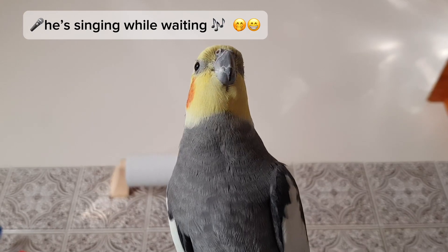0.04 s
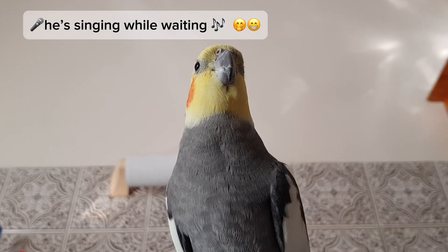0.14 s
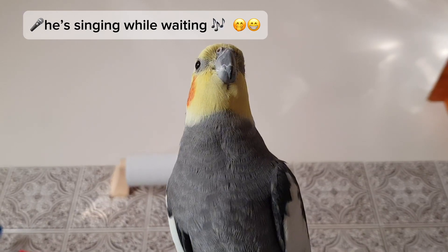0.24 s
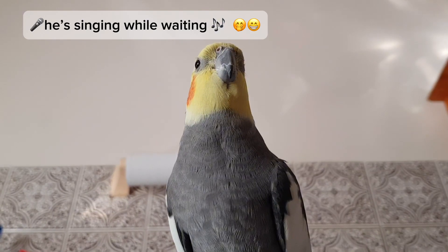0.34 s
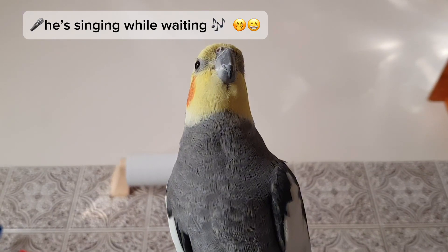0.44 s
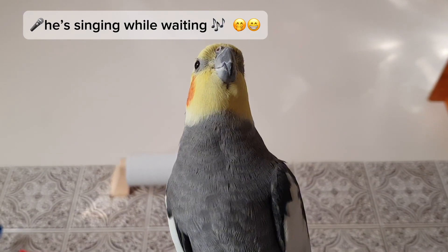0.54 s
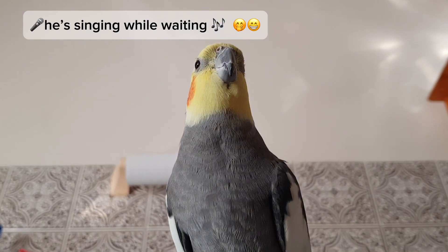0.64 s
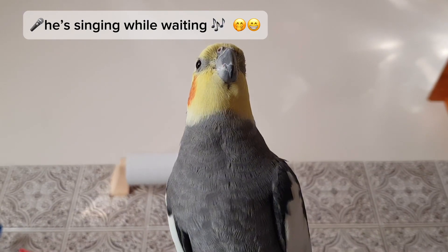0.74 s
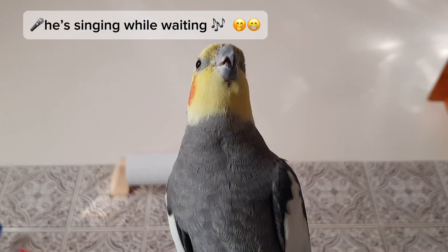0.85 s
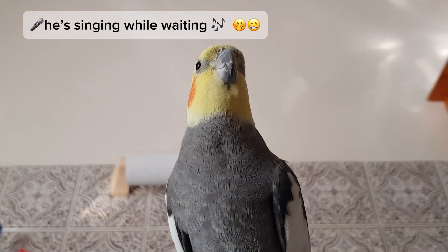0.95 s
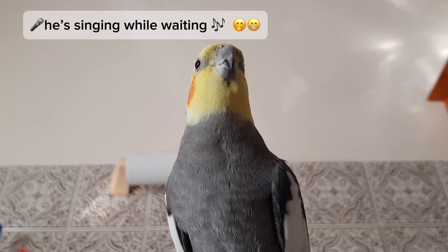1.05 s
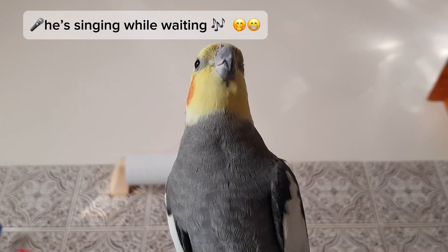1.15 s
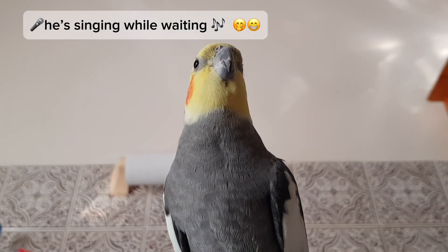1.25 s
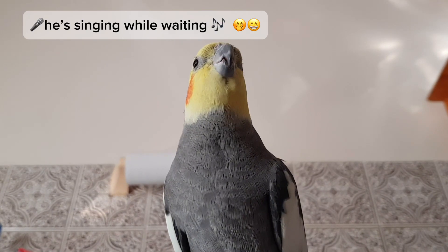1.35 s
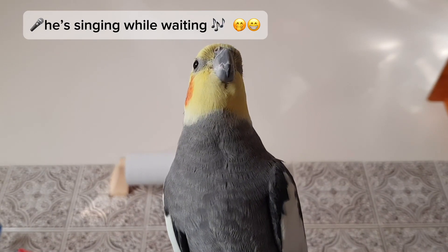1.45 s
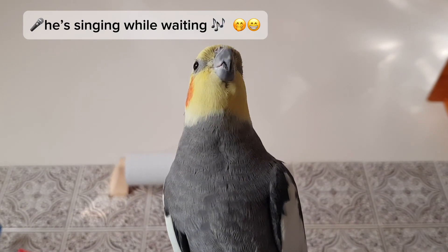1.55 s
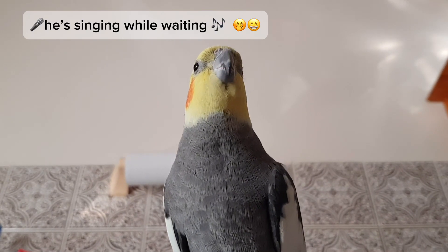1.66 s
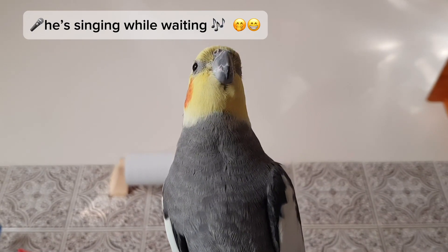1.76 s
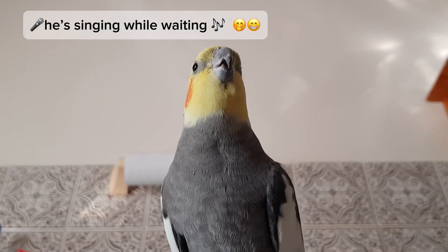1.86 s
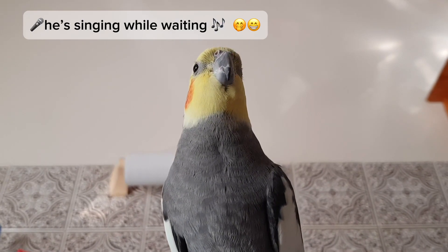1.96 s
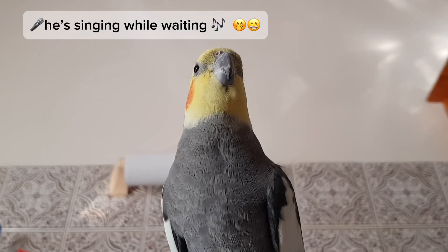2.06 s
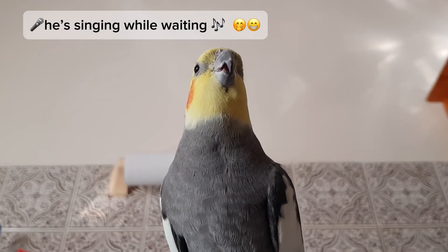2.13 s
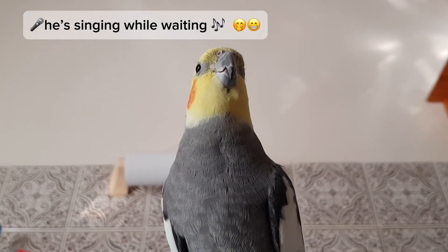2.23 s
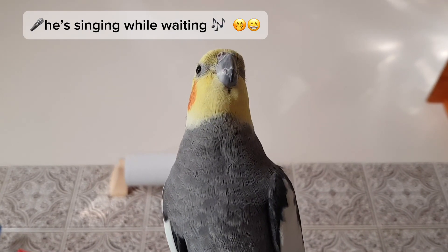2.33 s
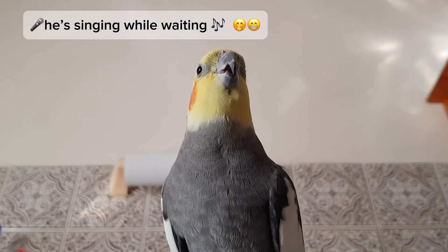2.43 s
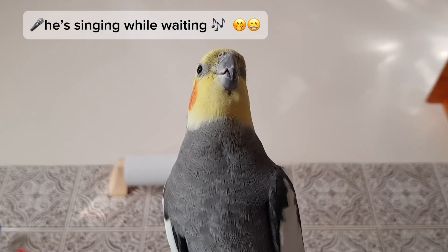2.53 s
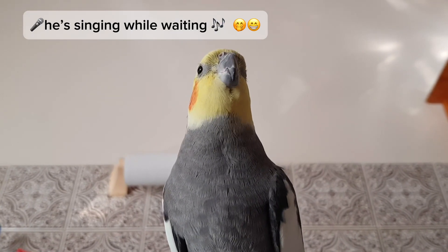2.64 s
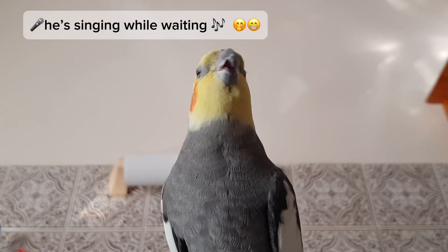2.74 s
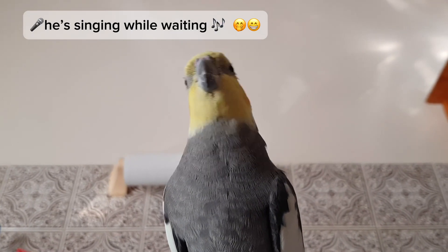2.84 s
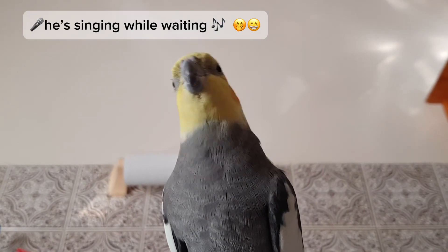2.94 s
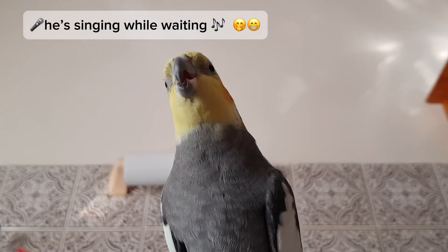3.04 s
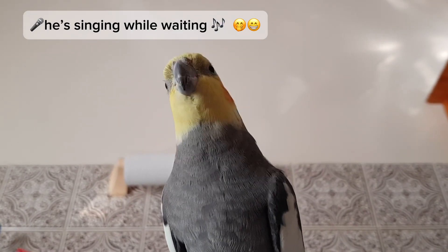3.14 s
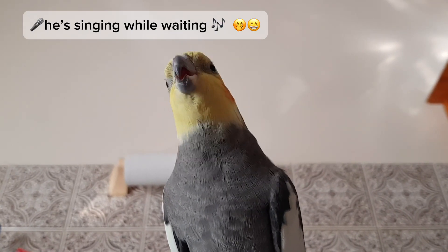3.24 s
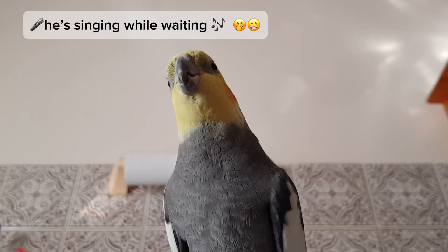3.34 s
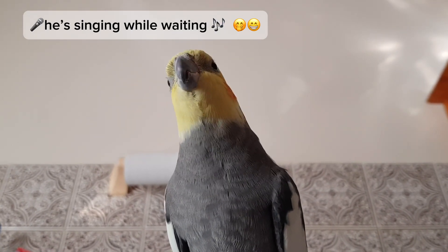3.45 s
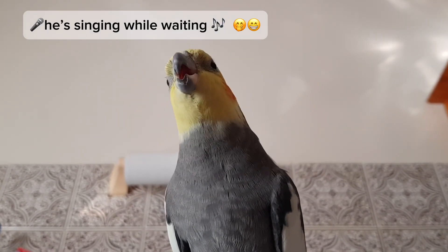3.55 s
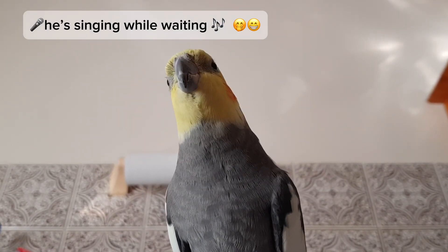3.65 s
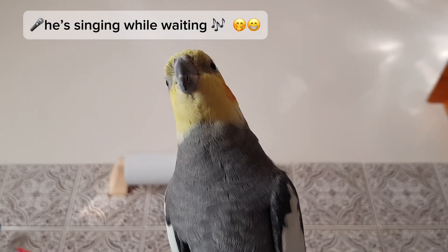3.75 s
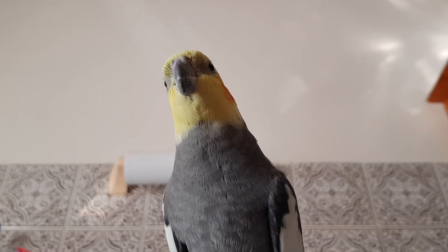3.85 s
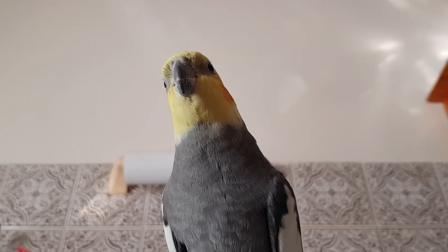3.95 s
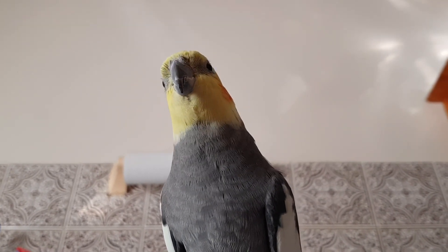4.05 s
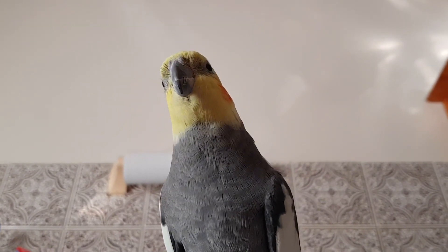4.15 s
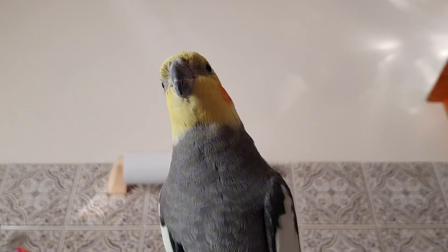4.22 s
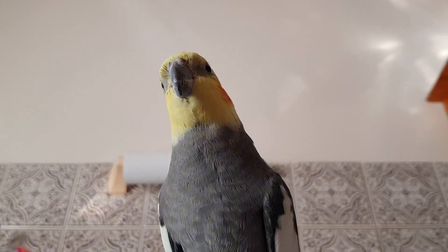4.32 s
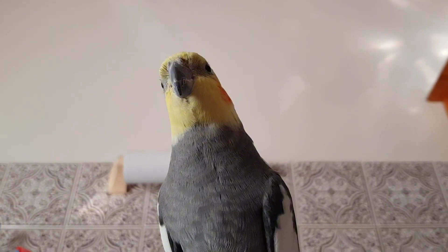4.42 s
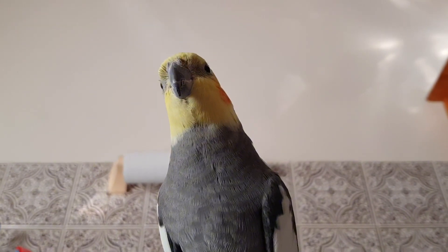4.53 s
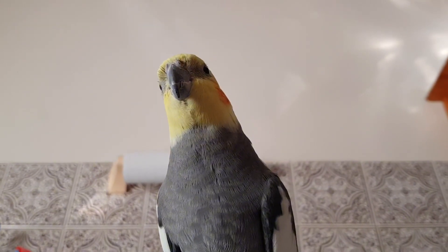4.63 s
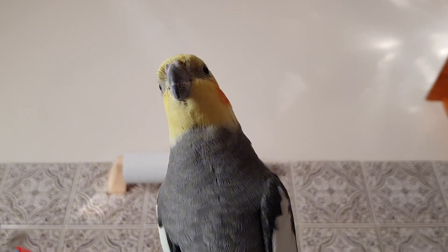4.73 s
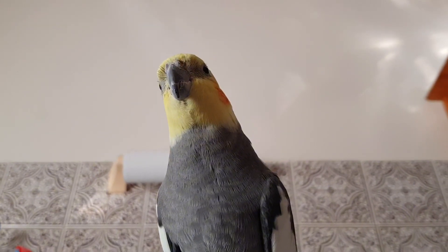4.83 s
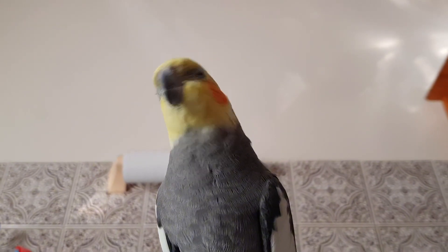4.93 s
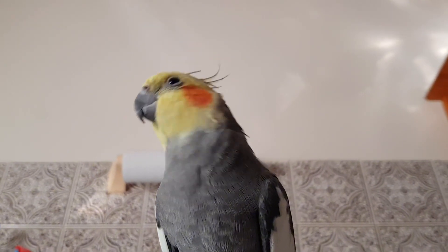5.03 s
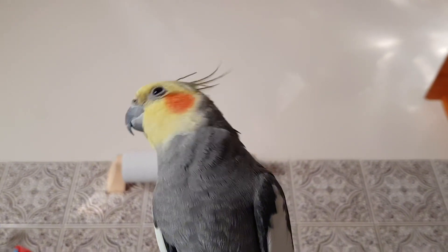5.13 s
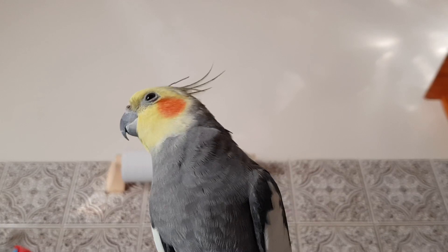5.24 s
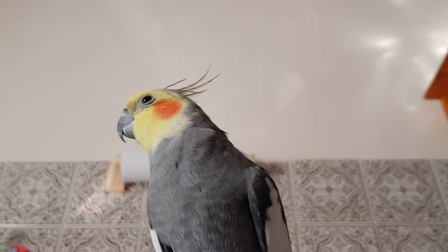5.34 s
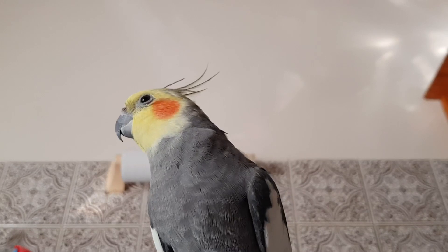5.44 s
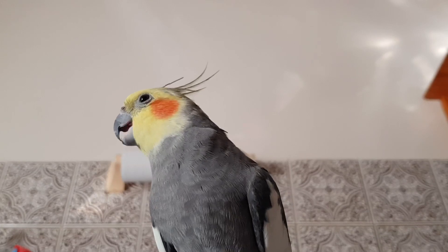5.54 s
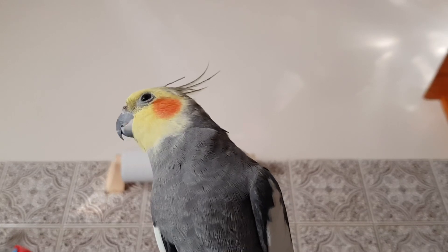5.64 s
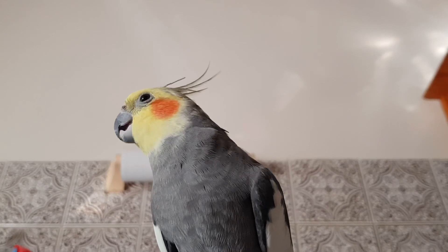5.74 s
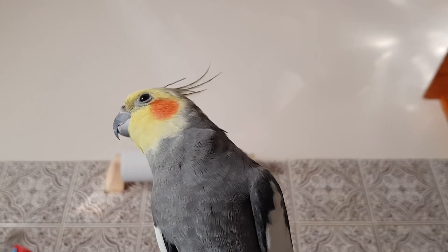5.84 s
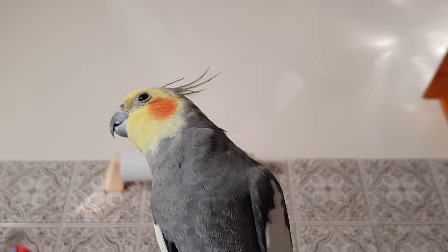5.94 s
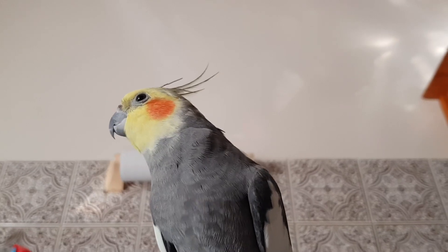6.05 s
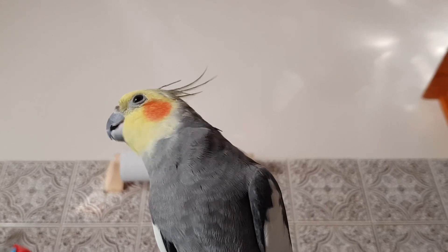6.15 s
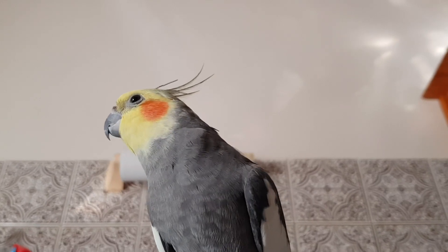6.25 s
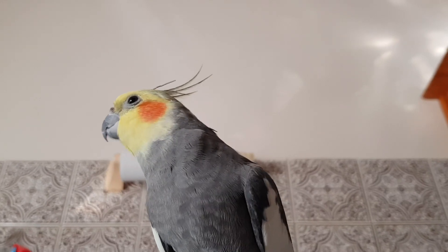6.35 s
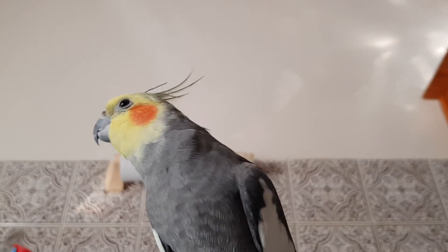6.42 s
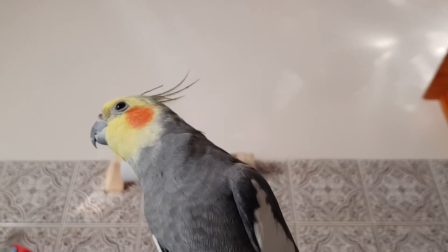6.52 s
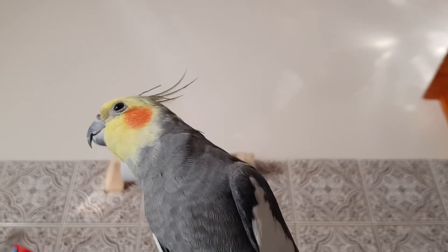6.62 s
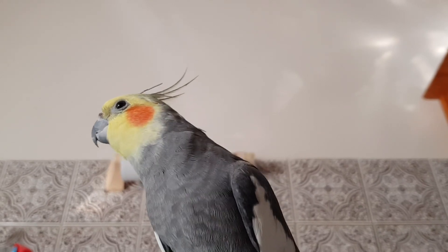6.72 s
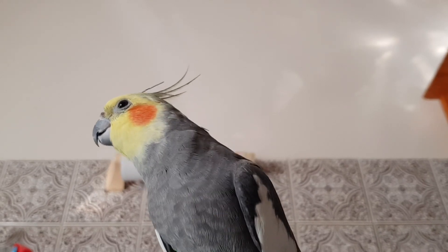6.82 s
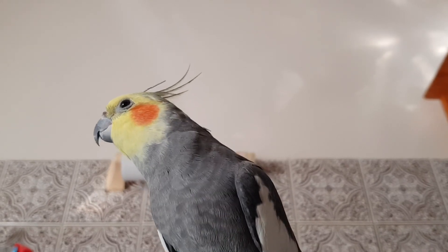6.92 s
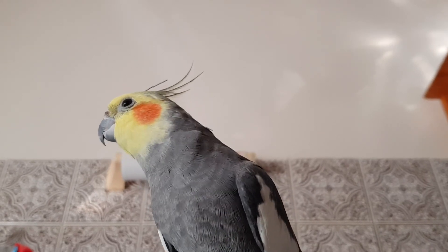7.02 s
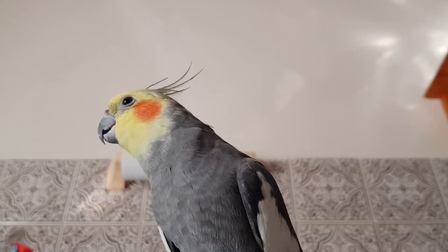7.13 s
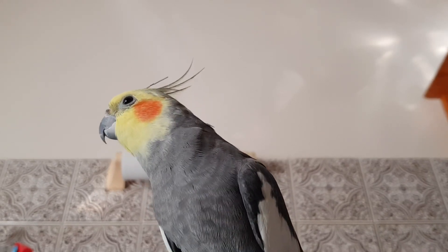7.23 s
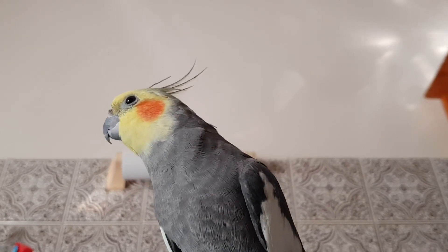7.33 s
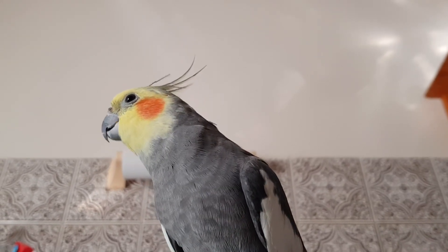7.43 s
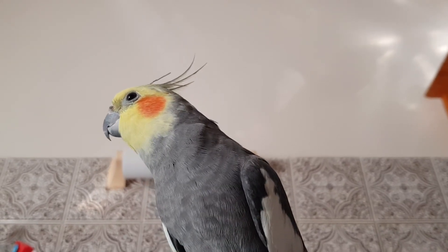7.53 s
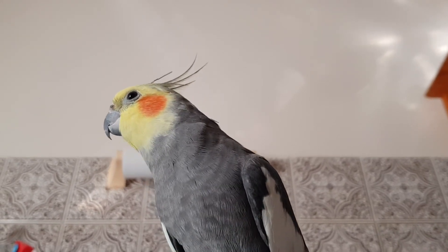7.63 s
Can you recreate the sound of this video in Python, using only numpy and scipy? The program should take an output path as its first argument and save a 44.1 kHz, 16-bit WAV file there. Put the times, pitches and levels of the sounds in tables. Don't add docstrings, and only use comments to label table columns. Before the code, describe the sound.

Close to a stereo microphone in a bare tiled room, a cockatiel sings about eleven short clear whistles, evenly spaced and mostly sliding upward, growing louder. After a pause of about two seconds it gives four quick hoarse squawks, then four lower, burry chirps. Faint mains hum, room rumble, hiss and weak clock ticks lie beneath, with dull handling thumps and a distant engine slowly rising in pitch.

```python
import sys
import numpy as np
from scipy import signal
from scipy.fft import rfft, irfft
from scipy.io import wavfile

SR = 44100
rng = np.random.default_rng(int(sys.argv[2]) if len(sys.argv) > 2 else 0)


def master(y):
    cut = np.clip(np.atleast_2d(y).T, -1, 1)
    pcm = np.round(cut * 32767)
    wavfile.write(sys.argv[1], SR, pcm.astype(np.int16))


def voltage_ratio(decibels):
    exponent = np.asarray(decibels, float) / 20
    return 10 ** exponent


N = 338688


def rms_one(x):
    return x / np.sqrt(np.mean(x ** 2) + 1e-20)


def in_time(rows, i):
    s, *columns = np.transpose(rows)
    return [np.interp(i / SR, s, c) for c in columns]


def at_hz(points, hz):
    points_hz, values = np.transpose(points)
    return np.interp(np.log(np.maximum(hz, 1)), np.log(points_hz), values)


def colour(x, gain):
    n = x.shape[-1]
    return irfft(rfft(x) * gain(np.fft.rfftfreq(n, 1 / SR)), n)


def drift(rate_hz):
    return rms_one(colour(rng.standard_normal(N), lambda hz: 1 / (1 + (hz / rate_hz) ** 2)))


# frequency in Hz, level in dB rms.
HUM_LINES = [(100.3, -62), (200.6, -69.5), (301, -80), (401, -82.5), (602, -84.5), (5560, -99)]
# time in seconds, gain in dB.
HUM_SWELL = [(0, 0), (1.5, 3), (3.5, -1), (5.5, -1.5), (6.5, 7.5), (7.68, 7)]


def hum():
    t, sway = np.arange(N) / SR, drift(3)
    total = np.zeros(N)
    for k, (hz, db) in enumerate(HUM_LINES):
        level_db = db + .7 * np.roll(sway, 30011 * k)
        phase = 2 * np.pi * hz * t + .2 * np.roll(sway, 30011 * k + 150001)
        total += np.sqrt(2) * voltage_ratio(level_db) * np.sin(phase)
    return total * voltage_ratio(in_time(HUM_SWELL, np.arange(N))[0])


# frequency in Hz, shared power 0-1.
PORT_LIKENESS = [(60, 0.65), (130, 0.31), (290, 0.65), (640, 0.15), (1400, 0.0073)]


def stereo_noise(spectrum):
    def alike(hz):
        return np.clip(at_hz(PORT_LIKENESS, hz), 0, 1)

    mid, side = rng.standard_normal((2, N))
    mid = colour(mid, lambda hz: voltage_ratio(at_hz(spectrum, hz)) * np.sqrt(1 + alike(hz)))
    side = colour(side, lambda hz: voltage_ratio(at_hz(spectrum, hz)) * np.sqrt(1 - alike(hz)))
    return rms_one(np.array([mid + side, mid - side]))


# frequency in Hz, density in dB per Hz.
RUMBLE_SPECTRUM = [(18, -20.5), (38, -11.5), (70, -2), (140, -10), (195, 0), (265, -11), (420, -16.5),
                   (600, -17.5), (850, -26.5), (1400, -41)]
# time in seconds, level in dB.
RUMBLE_LEVEL = [(0, -68.5), (1.7, -63.5), (3.3, -69), (5.65, -69.5), (6.03, -62.5), (7.12, -57.5),
                (7.68, -60)]


def rumble():
    level_db = in_time(RUMBLE_LEVEL, np.arange(N))[0] + 3.0 + 0.44 * drift(5.3)
    return voltage_ratio(level_db) * stereo_noise(RUMBLE_SPECTRUM)


# frequency in Hz, density in dB per Hz.
HISS_SPECTRUM = [(500, -23), (1000, -1), (2000, -1.5), (3500, -16.5), (5000, -8.5), (5600, 2),
                 (6400, -15.5), (7400, -11.5), (9000, -7.5), (10700, 1), (16000, 1)]


def hiss():
    level_db = -76.5
    return voltage_ratio(level_db) * stereo_noise(HISS_SPECTRUM) * voltage_ratio([[-1.2], [1.2]])


# start in seconds, end in seconds, depth 0-1.
DOUBLING = [
    (5.71, 5.835, 0.13),
    (5.92, 5.95, 0.24),
    (5.982, 6.037, 0.4),
    (6.095, 6.128, 0.3),
    (6.185, 6.244, 0.4),
    (6.35, 6.387, 0.3),
    (6.41, 6.505, 0.5),
]


def doubling_depth():
    t = np.arange(N) / SR
    return sum(d * np.interp(t, [a, a + 0.0033, b - .004, b], [0, 1, 1, 0]) for a, b, d in DOUBLING)


def half_line_chaos(hz, phase, i, wobble, flutter, patches, noise):
    chaos = .3 * noise[i] * voltage_ratio(5 * np.clip(flutter[i - 555], -3, 1.5))
    for k in range(1, 26):
        stray = 2 * np.pi * np.cumsum(320 * wobble[i - 1301 * k]) / SR
        level = .2 * voltage_ratio(6.5 * np.minimum(patches[i - 1499 * k], 1.4))
        chaos += level * (k * hz < SR / 1.25) * np.sin(k * phase / 2 + stray)
    return chaos


# time in seconds, overtone gain in dB.
GAPE = [(0, -2.5), (2.3, -5), (2.7, -2), (3.0, 1.5), (3.6, 1), (5.6, -0.5)]
# frequency in Hz, density in dB per Hz.
RASP_SPECTRUM = [(450, -20), (900, -12), (1500, 0), (3200, 5), (4800, -11), (6500, -23.5), (8000, -35),
                 (10000, -16), (12500, -9.5), (16000, -23)]


def syrinx(notes, overtones, jitter, ragged_db, follow, breath_db):
    tone, rasp = np.zeros(N), np.zeros(N)
    wobble, flutter, patches, noise = drift(130), drift(90), drift(35), rng.standard_normal(N)
    depth = doubling_depth()
    for rows in notes:
        i = np.arange(round(rows[0][0] * SR), round(rows[-1][0] * SR))
        hz, level_db, octave_db, *rasp_db = in_time(rows, i)

        leak_db = -8.3 * (((i - i[0]) / SR - .018) / 0.0077) ** 2
        rasp_db = rasp_db[0] if rasp_db else level_db.max() + breath_db + leak_db
        loud_db = level_db + np.maximum(octave_db, 0)
        hoarse = np.clip(voltage_ratio(rasp_db - loud_db), 0, 1)

        shake = jitter + .07 * hoarse + .02 * voltage_ratio(leak_db)
        phase = 2 * np.pi * np.cumsum(hz * (1 + shake * wobble[i])) / SR

        octave = voltage_ratio(octave_db + ragged_db * np.clip(wobble[i - 777], -3, 1.2))
        wave = voltage_ratio(level_db) * (np.sin(phase) + octave * np.sin(2 * phase))

        bright_db = level_db + .35 * (loud_db - loud_db.max()) + follow * octave_db
        bright_db += in_time(GAPE, i)[0]
        for k in range(3, 11):
            patch_db = 3.7 * np.minimum(patches[i - 997 * k], 1.5)
            partial = voltage_ratio(bright_db + at_hz(overtones, k * hz) + patch_db)
            wave += partial * (k * hz < SR / 2.5) * np.sin(k * phase + k * k)

        fade = np.clip(np.minimum(i - i[0], i[-1] - i) / (.004 * SR), 0, 1)
        unsteady = voltage_ratio((ragged_db / 4 + 7 * hoarse) * np.clip(flutter[i], -3, 1.2))
        doubled = 1 + depth[i] * np.cos(phase / 2)
        tone[i] += np.sqrt(2) * fade * wave * unsteady * doubled
        rasp[i] += fade * voltage_ratio(rasp_db) * half_line_chaos(hz, phase, i, wobble, flutter, patches, noise)
    return tone + colour(rasp, lambda hz: voltage_ratio(at_hz(RASP_SPECTRUM, hz) + 2.5))


def peep(s, length, hz, last_hz, db):
    edge_db, octave_db = -10, -37.5
    return [(s + share * length, hz + share * (last_hz - hz), db + edge * edge_db, octave_db)
            for share, edge in [(0, 1), (.25, 0), (1, 0.58)]]


# frequency in Hz, gain in dB.
SHADE = [(3300, 0), (5200, -6.5), (6300, 0.5), (7700, -6.5), (9000, -1)]
# frequency in Hz, extra lead in radians.
BEND = [(3000, 0.18), (5400, 0.51), (6300, 1.4), (7700, -0.91), (9000, 0.87), (11000, -0.57)]


def at_ports(x, lead, pan_db, shaded):
    def left_path(hz):
        phase = 2 * np.pi * hz * lead / SR + shaded * at_hz(BEND, hz)
        return np.exp(1j * phase) * voltage_ratio(shaded * at_hz(SHADE, hz))

    return np.array([colour(x, left_path), x]) * voltage_ratio([[pan_db / 2], [-pan_db / 2]])


# frequency in Hz, T60 in seconds.
ROOM_T60 = [(500, 0.88), (1500, 0.33), (3000, 0.3), (6000, 0.29), (12000, .2)]
# frequency in Hz, gain in dB.
ROOM_GAIN = [(500, 8), (3000, 12), (5000, 11.5), (12000, 19)]


def tiled_room(x, wet_db, late_db, alike):
    t, edges_hz, tail = np.arange(SR) / SR, 350 * 2 ** np.arange(0, 5.6, .5), 0
    shared, *own = rng.standard_normal((3, SR))
    common = np.array([shared, np.roll(shared, 6)])
    white = np.sqrt(alike) * common + np.sqrt(1 - alike) * np.array(own)
    for low, high in zip(edges_hz, edges_hz[1:]):
        t60 = at_hz(ROOM_T60, np.sqrt(low * high))
        band = signal.sosfilt(signal.butter(2, [low, high], "band", fs=SR, output="sos"), white)
        decay = voltage_ratio(-60 * t / t60) + voltage_ratio(late_db - 60 * t / (1.5 * t60))
        tail = tail + band * voltage_ratio(at_hz(ROOM_GAIN, low)) * decay
    tail = tail * np.clip((t - .002) / 0.0012, 0, 1)
    return voltage_ratio(wet_db) * signal.fftconvolve(x[None], tail / np.sqrt(SR / 46), axes=1)[:, :N]


def puffs(events, low_hz, high_hz, t60):
    t = np.arange(N) / SR
    shape = sum(voltage_ratio(db - 60 * np.clip(t - s, 0, 1) / t60) * (t > s) for s, db in events)
    band = signal.butter(2, [low_hz, high_hz], "band", fs=SR, output="sos")
    return shape * rms_one(signal.sosfilt(band, rng.standard_normal((2, N))))


# time in seconds, level in dB.
TICKS = [
    (.77, -73),
    (1.77, -78),
    (2.9, -73.5),
    (3.77, -77),
    (4.77, -77),
]


def clock():
    return puffs(TICKS, 1300, 6500, t60=.35)


def whistle(s, low, hz, last_hz, db):
    length_s, release_s = 0.087, .021
    lock_octave_db, scoop_octave_db = -33.5, -32.5
    rich_db = -33 + .15 * max(hz - last_hz, 0)
    return [(s, low, db - 34.5, lock_octave_db),
            (s + .006, low, db - 25, lock_octave_db),
            (s + 0.017, low + .7 * (hz - low), db - 13, scoop_octave_db),
            (s + .033, hz, db - 3.5, scoop_octave_db),
            (s + length_s - release_s, last_hz, db, rich_db),
            (s + length_s, 0.93 * last_hz, db - 22, rich_db)]


# start in seconds, length in seconds, first Hz, last Hz, peak in dB.
PEEPS = [
    (.616, .034, 2060, 1993, -51.5),
    (1.668, .022, 1750, 1590, -49.5),
    (1.669, .021, 4150, 4120, -64.5),
    (3.612, .03, 1480, 1580, -56.5),
]
# time in seconds, pitch in Hz, level in dB,
# octave in dB re fundamental.
FIRST_WHISTLE = [(.855, 2280, -62, -12.5), (.861, 2130, -34, -16.5), (.872, 2277, -23, -35),
                 (.885, 2397, -17, -32.5), (.901, 2063, -25.5, -3), (.914, 2006, -21.5, -22),
                 (.924, 2110, -29.5, -28), (.935, 2250, -45, -23.5)]
# start in seconds, first Hz, pitch in Hz after the scoop, last Hz, peak in dB.
WHISTLES = [
    (1.071, 2170, 2600, 2816, -11.5),
    (1.33, 1910, 2381, 2311, -14.5),
    (1.596, 2010, 2543, 2594, -11),
    (1.845, 1964, 2630, 2875, -10),
    (2.125, 2243, 2697, 3013, -8.5),
    (2.434, 2274, 2743, 2840, -9.5),
    (2.705, 2063, 2778, 3010, -7.5),
    (2.977, 2167, 2885, 3070, -10),
    (3.235, 1966, 2785, 3046, -10.5),
    (3.483, 2119, 2814, 3079, -10.5),
]
# frequency in Hz, level in dB re note.
FACING = [(4000, -24.5), (7000, -33), (9000, -42), (11500, -28), (13500, -28.5), (16000, -47)]


def whistle_bout():
    notes = [peep(*p) for p in PEEPS] + [FIRST_WHISTLE] + [whistle(*w) for w in WHISTLES]
    return syrinx(notes, FACING, jitter=0.0044, ragged_db=0.5, follow=0, breath_db=-33)


# time in seconds, level in dB.
THUMPS = [
    (2.99, -55),
    (4.65, -60),
]


def grip_thumps():
    return puffs(THUMPS, 30, 200, t60=.25) * [[1], [.6]]


# time in seconds, firing rate in Hz, tone level in dB.
ENGINE = [(3.9, 102.2, -78), (4.4, 108, -62), (5, 113.3, -73.5), (5.6, 118.1, -62), (6.1, 123.1, -62),
          (6.8, 125.7, -55), (7.1, 132.5, -68.5), (7.68, 142, -63)]
# multiple of the firing rate, level in dB.
ENGINE_ORDERS = [(.5, -12), (1, 2), (1.6, -9.5), (2, -17)]


def engine():
    i = np.arange(N)
    hz, level_db = in_time(ENGINE, i)
    phase = 2 * np.pi * np.cumsum(hz) / SR
    orders = sum(voltage_ratio(db + .9 * drift(3)) * np.sin(k * phase) for k, db in ENGINE_ORDERS)
    fade_in = np.clip((i / SR - ENGINE[0][0]) / 0.55, 0, 1)
    return np.sqrt(2) * voltage_ratio(level_db) * orders * fade_in


def rasped(rows, share, db, end_db):
    start_db = -21
    s = np.array(rows)[:, 0]
    top_s = s[0] + share * (s[-1] - s[0])
    times = np.union1d(s, top_s)
    rasp_db = db + np.interp(times, [s[0], top_s, s[-1]], [start_db, 0, end_db])
    return np.transpose([times, *in_time(rows, times * SR), rasp_db])


# share of the arch, share of the pitch lift, level in dB, octave in dB.
CHIRP_ARCH = [(0, 0.055, -35.5, -10), (.17, 0.023, -11, -12.5), (.62, .75, -5, -12.5), (1, 0.98, 2, -3)]
# share of the pitch lift, level in dB, octave in dB.
CHIRP_MIDFALL = (0.44, -12, 15)
# share of the rest, pitch ratio, level in dB, octave in dB.
CHIRP_REST = [(0, 1.01, -10.5, 11.5), (.3, 1, -17, 8.5), (.65, 1.05, -6.5, -16.5), (.92, .97, -8.5, -27),
              (1, .98, -41, -8)]


def chirp(s, rise, length, hz, db):
    fall_s, lift_hz = .034, 0.29 * hz
    top, down = s + rise, s + rise + fall_s
    rows = [(s + share * rise, hz + up * lift_hz, db + re_db, octave_db)
            for share, up, re_db, octave_db in CHIRP_ARCH]
    up, re_db, octave_db = CHIRP_MIDFALL
    rows += [(top + fall_s / 2, hz + up * lift_hz, db + re_db, octave_db)]
    rows += [(down + share * (s + length - down), ratio * hz, db + re_db, octave_db)
             for share, ratio, re_db, octave_db in CHIRP_REST]
    return rasped(rows, 0.22, db - 26, end_db=-7.5)


# time in seconds, pitch in Hz, fundamental in
# dB, octave in dB re fundamental.
SQUAWKS = [
    [(5.716, 1158, -83, 23), (5.733, 1063, -57.5, 13), (5.747, 1579, -64.5, 11), (5.755, 1615, -53.5, 20.5),
     (5.775, 1693, -67.5, 25), (5.798, 1717, -56, 39.5), (5.812, 1721, -53, 13), (5.83, 1755, -54.5, 17),
     (5.85, 1696, -52.5, 10.5)],
    [(5.93, 1519, -59, 6), (5.936, 1668, -38, -38.5), (5.956, 2144, -25, -19), (5.972, 2340, -40.5, -25),
     (5.986, 2480, -29, -28.5), (6.005, 2263, -36.5, -29.5), (6.022, 2042, -37, -30),
     (6.038, 1556, -39, -28.5), (6.058, 1318, -47, -10)],
    [(6.118, 1366, -56, -17), (6.124, 1394, -35.5, -9), (6.136, 1460, -36, -23.5), (6.146, 1930, -28.5, -3),
     (6.163, 1895, -32, 3), (6.178, 1650, -47, 10.5), (6.192, 1700, -52, 12), (6.208, 2106, -35.5, -18.5),
     (6.282, 1326, -43, -19)],
    [(6.355, 1407, -60, -9), (6.361, 1400, -42, 1.5), (6.376, 1500, -38.5, -12.5), (6.391, 2087, -27, -12),
     (6.404, 1508, -49.5, 16), (6.418, 1590, -47, 16.5), (6.45, 1350, -47.5, 14), (6.478, 1100, -50, 6.5),
     (6.528, 1318, -44.5, -46)],]
# share of the squawk at the rasp's top, level in dB.
SQUAWK_RASP = [
    (0.52, -38),
    (0.24, -34),
    (.42, -27),
    (0.34, -29),
]
# start in seconds, rise in seconds, length in seconds, resting pitch in Hz, level in dB.
CHIRPS = [
    (6.609, 0.03, 0.15, 1365, -26.5),
    (6.852, .031, .156, 1397, -22),
    (7.132, .033, 0.14, 1398, -21.5),
    (7.415, 0.026, 0.14, 1307, -26),
]
# frequency in Hz, level in dB re note.
TURNED = [(3000, -4.5), (5000, -19), (6600, -32), (9000, -44.5), (12000, -23), (16000, -40)]


def squawks_and_chirps():
    notes = [rasped(rows, share, db, end_db=-23)
             for rows, (share, db) in zip(SQUAWKS, SQUAWK_RASP)]
    notes += [chirp(*c) for c in CHIRPS]
    return syrinx(notes, TURNED, jitter=0.0099, ragged_db=-1.0, follow=0.53, breath_db=0)


def scene():
    low = (hum() + engine() + rumble()) * voltage_ratio([[-2.8], [2.3]])
    whistles, squawks = whistle_bout(), squawks_and_chirps()
    bird = at_ports(whistles, lead=4.7, pan_db=-2.2, shaded=1)
    bird += at_ports(squawks, lead=9.2, pan_db=-2.1, shaded=0)
    turned_db = 2.5
    bird += tiled_room(whistles + voltage_ratio(turned_db) * squawks, wet_db=-10.5, late_db=-30, alike=0.11)
    return bird + low + clock() + grip_thumps() + hiss()


def top_cut(x):
    return signal.sosfilt(signal.butter(12, 15830, fs=SR, output="sos"), x)


def record(dry):
    mix = colour(dry, lambda hz: hz < 15830)
    return top_cut(mix)


dry = scene()
out = record(dry)
master(out)
```